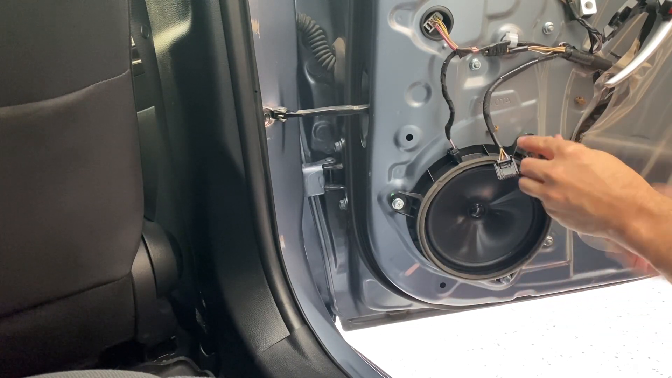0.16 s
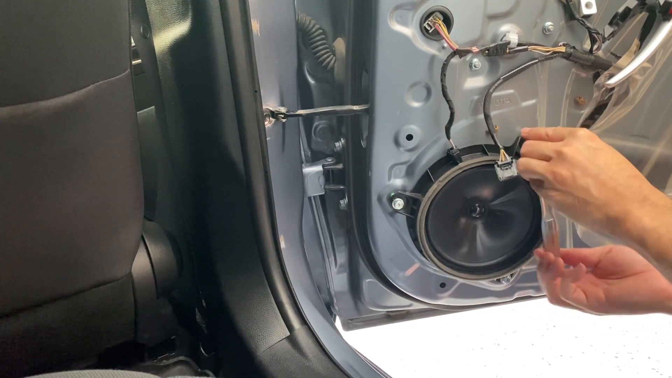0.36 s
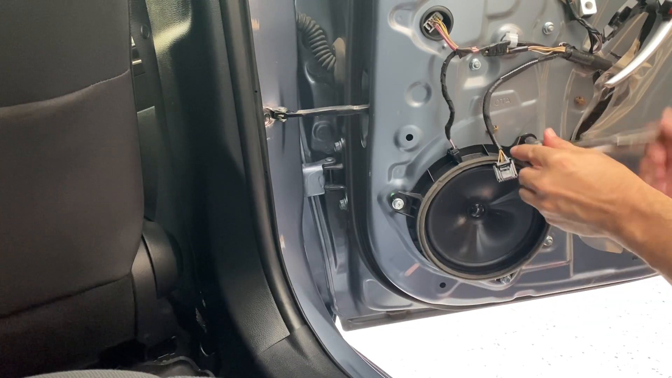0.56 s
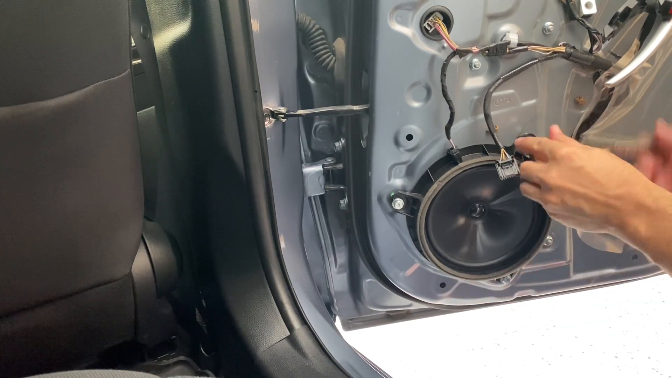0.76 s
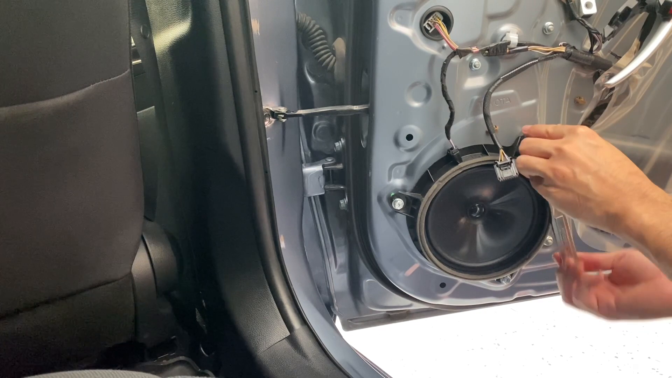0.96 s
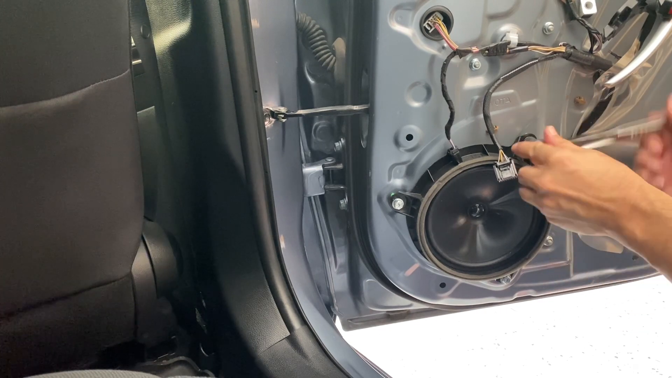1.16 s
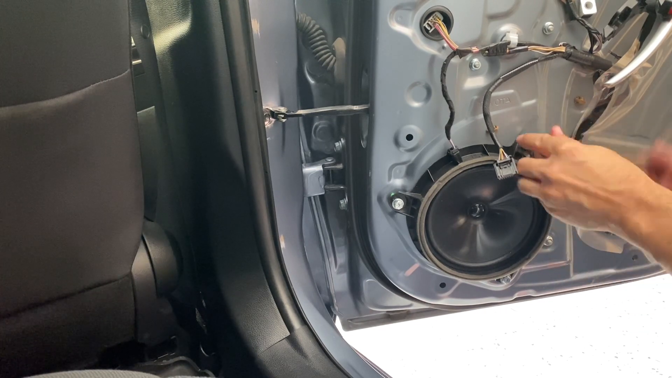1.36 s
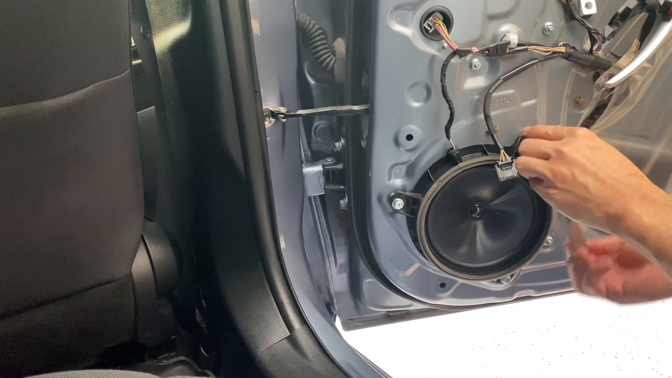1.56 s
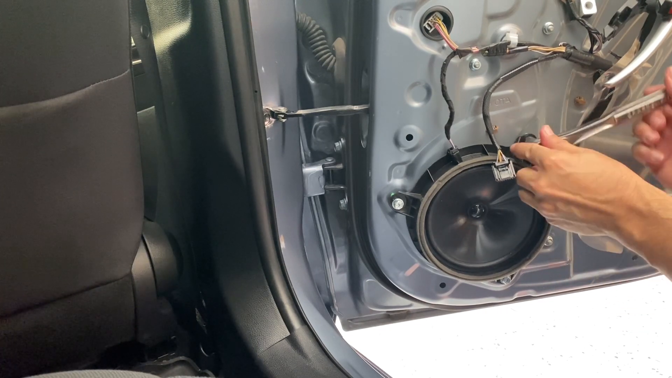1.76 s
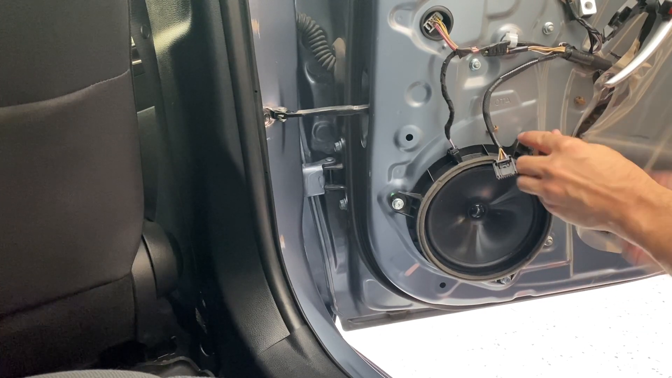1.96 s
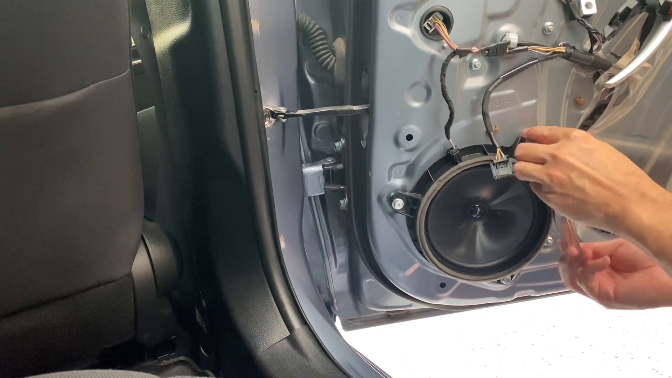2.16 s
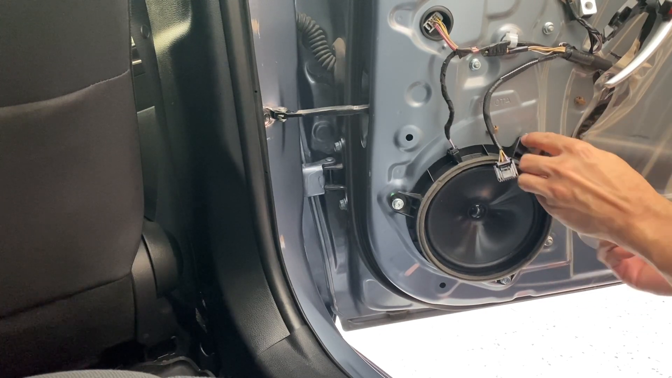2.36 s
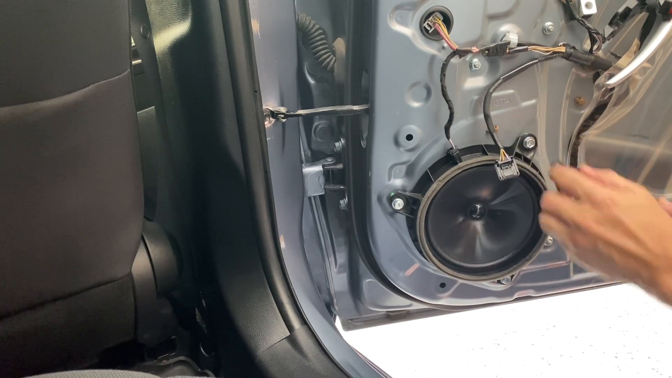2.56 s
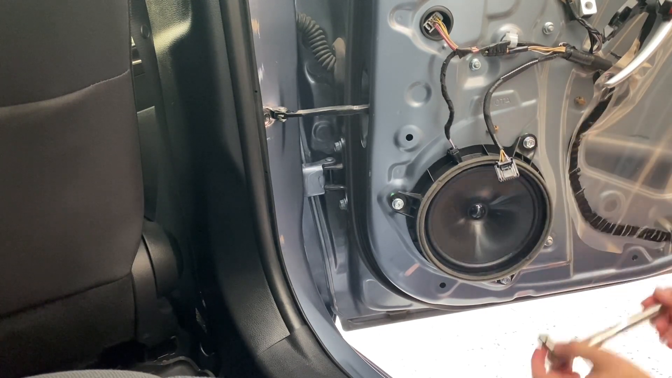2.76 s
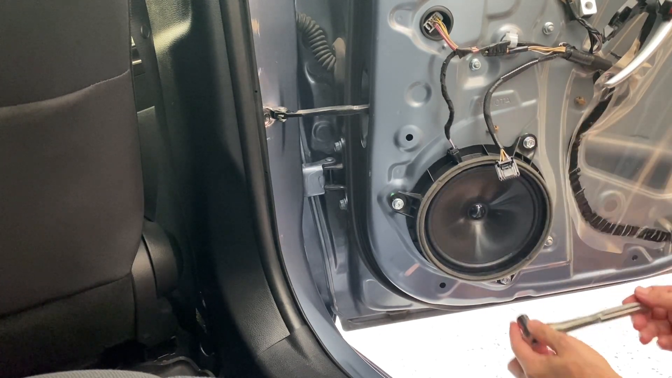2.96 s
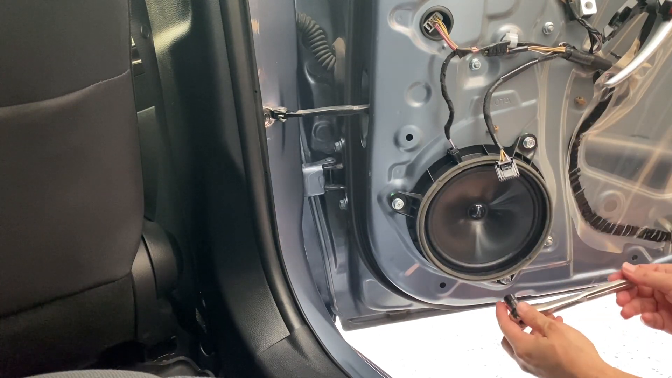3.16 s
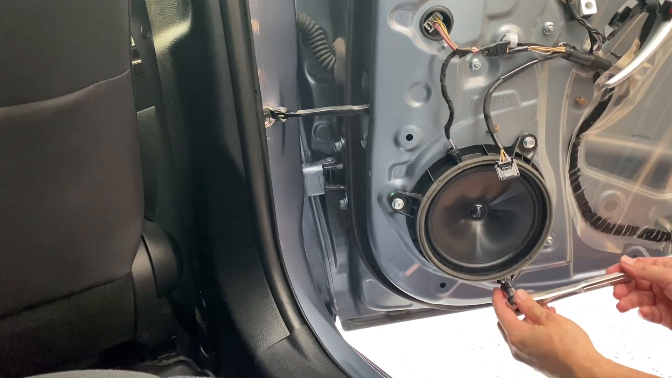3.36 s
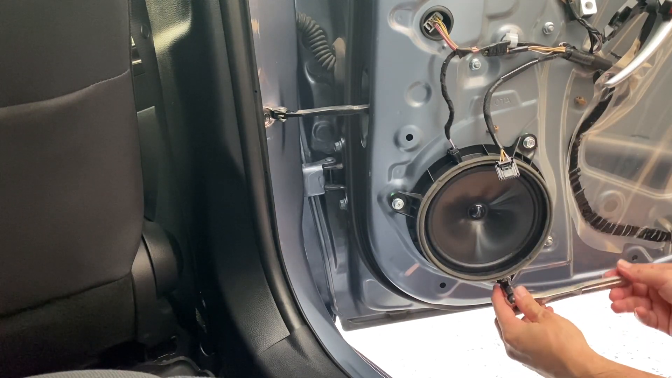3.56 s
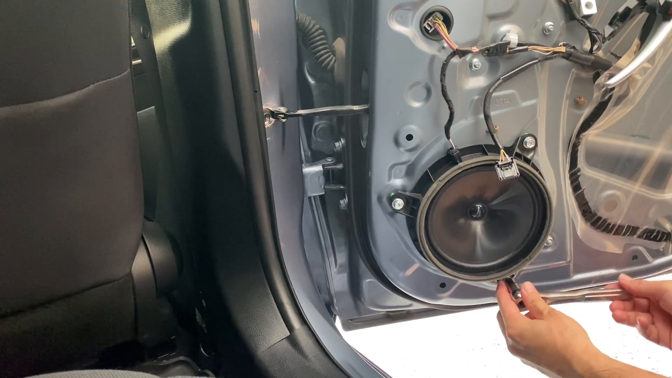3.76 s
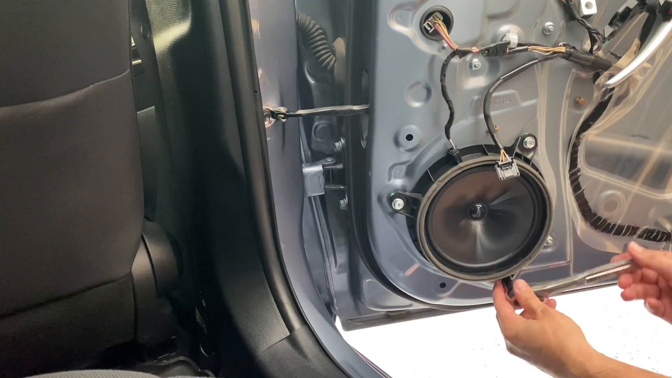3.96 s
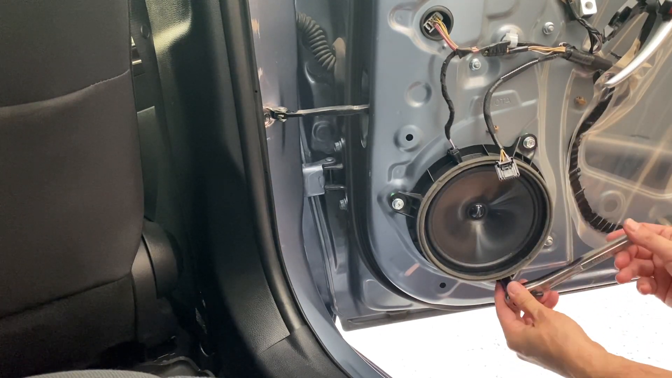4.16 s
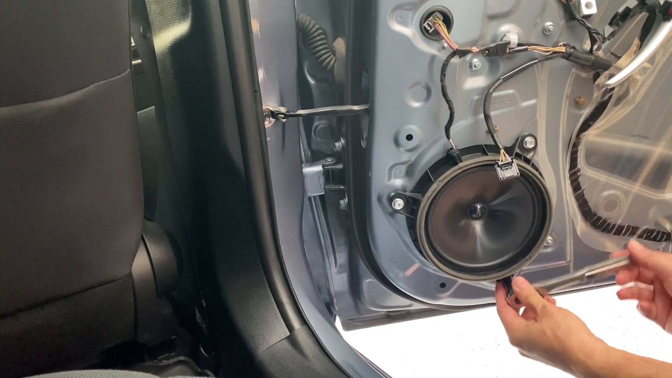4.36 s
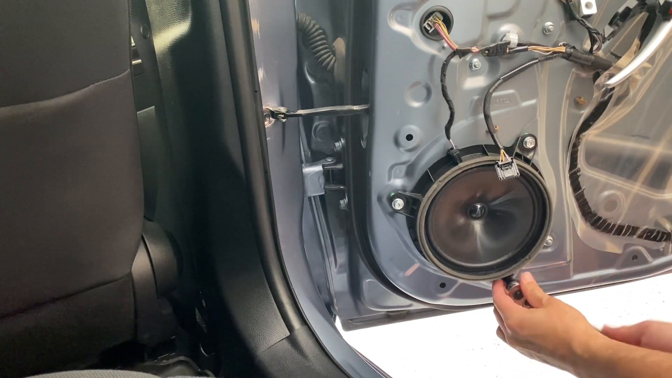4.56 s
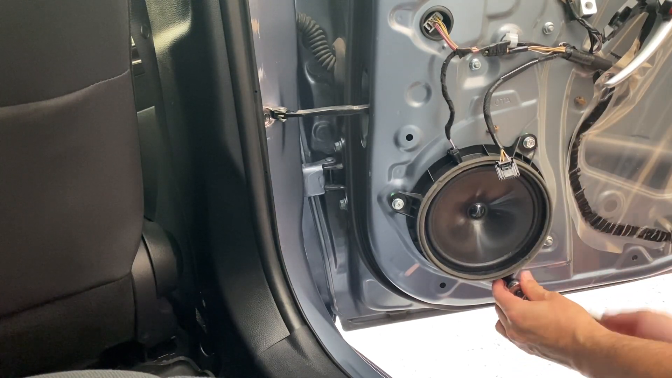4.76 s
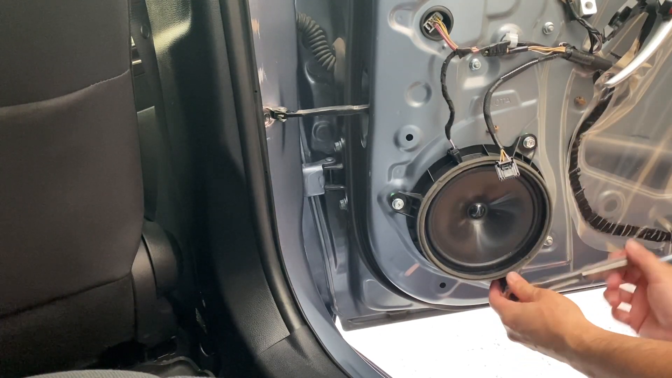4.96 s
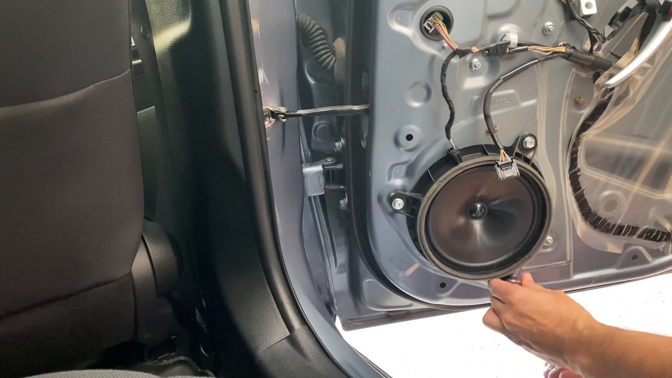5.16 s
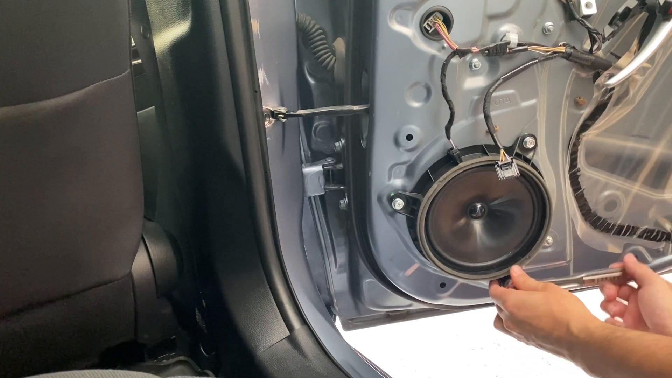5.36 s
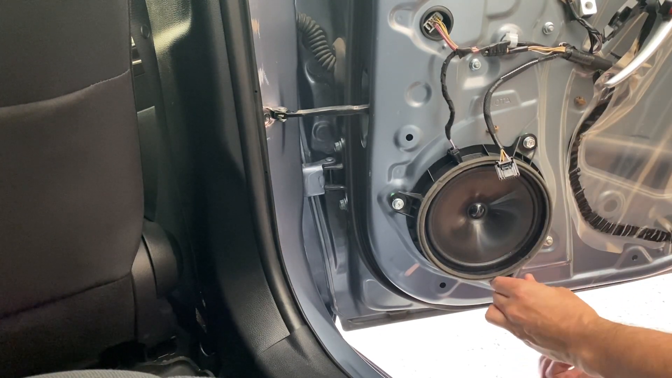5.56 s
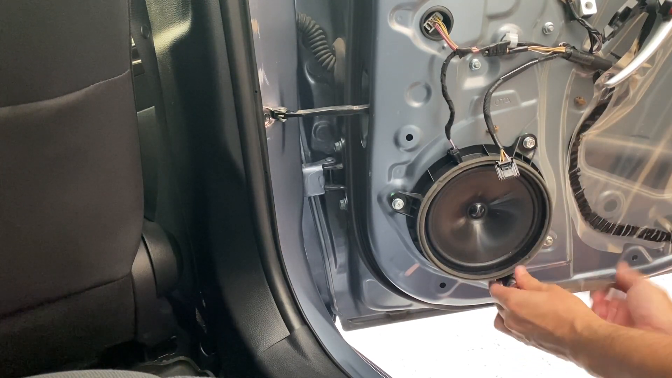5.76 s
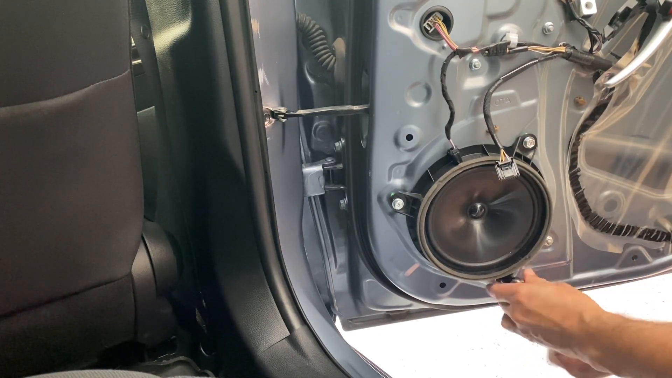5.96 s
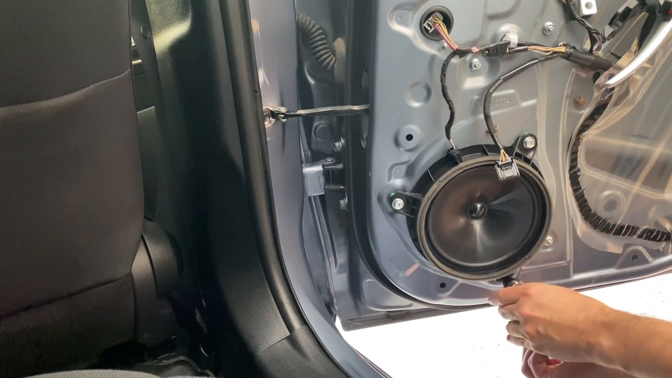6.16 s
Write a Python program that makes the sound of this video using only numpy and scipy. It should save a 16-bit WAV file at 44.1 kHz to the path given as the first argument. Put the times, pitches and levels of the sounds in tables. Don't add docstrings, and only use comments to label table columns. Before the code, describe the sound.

A hand ratchet clicks in quick bursts on a hollow car door, booming softly underneath, then the socket clacks onto a lower bolt and clicks again.

```python
import sys
import numpy as np
from scipy import signal
from scipy.fft import rfft, irfft, next_fast_len
from scipy.io import wavfile

SR = 44100
rng = np.random.default_rng(int(sys.argv[2]) if len(sys.argv) > 2 else 0)


def unload_audio(sound):
    columns = np.transpose(np.atleast_2d(sound))
    steps = np.round(np.clip(columns, -1, 1) * 32767)
    wavfile.write(sys.argv[1], SR, steps.astype(np.int16))


def attenuation_scalar(level_db):
    decades = np.asarray(level_db, float) / 20
    return 10 ** decades


N = 273861

# pitch_hz, level_db (per Hz)
HUSH = [(25, -27), (43, -3), (72, -3), (390, -33.5), (427, -18), (480, -44.5), (9000, -54), (16000, -75.5)]
# pitch_hz, level_db (per Hz)
RUMBLE = [(15, -57.5), (25, -22.5), (92, 0), (178, -2), (227, -11), (303, -19), (400, -33.5), (880, -100)]
# pitch_hz, level_db (per Hz)
SCUFF = [(250, -15.5), (320, 11), (900, -5), (1600, 2.5), (3000, -17.5), (5600, -22.5), (11000, -29.5),
         (16000, -32)]
# start_s, grip_db, slide_db
HAND_WORK = [(0.0, -44, -46.5), (0.25, -42.5, -99), (0.427, -73, -55), (0.574, -41.5, -42),
             (0.803, -45, -61), (1.53, -44, -60), (1.729, -42.5, -46), (2.0, -47, -64.5), (2.6, -61, -81.5),
             (2.859, -77.5, -83.5), (3.452, -71, -84), (3.607, -54.5, -56.5), (4.06, -61.5, -83.5),
             (4.301, -58.5, -73.5), (4.786, -50.5, -74.5), (4.881, -45.5, -62.5), (5.9, -45.5, -61),
             (6.21, -59, -77.5)]
# start_s, peak_db, pitch_hz, swell_ms
BOOMS_UPPER = [(0.024, -20, 184.7, 6.9), (0.105, -28, 186.4, 4.3), (0.119, -21.5, 183.7, 6.3),
               (0.2, -41.5, 181, 13), (0.387, -29.5, 175.3, 5.5), (0.473, -18.5, 172, 6.2),
               (0.494, -20, 166.7, 7.6), (0.532, -27, 177, 16), (0.615, -30, 188.6, 9.3),
               (0.741, -20, 186.6, 10.3), (0.837, -35.5, 189.1, 14), (0.909, -28, 174.2, 9.4),
               (0.996, -26.5, 160.4, 4.4), (1.043, -32, 164.5, 15), (1.08, -25.5, 182.7, 9.6),
               (1.12, -30, 165.2, 13), (1.19, -30, 172, 9), (1.22, -30, 183.8, 6.3),
               (1.34, -20.5, 185.4, 10), (1.437, -31.5, 202.4, 17), (1.495, -30, 144.6, 7.2),
               (1.568, -8.5, 179, 5.7), (1.616, -32, 132, 35), (1.715, -22, 155, 4.2),
               (1.802, -38.5, 200.7, 6.5), (1.902, -20.5, 181, 11), (1.922, -28.5, 182.6, 11),
               (2.063, -35.5, 191.6, 16), (2.257, -31.5, 151.6, 6.8), ]
# start_s, peak_db, pitch_hz, swell_ms
BOOMS_LOWER = [(2.348, -25, 177, 11.5), (2.39, -22, 175, 1.7), (2.452, -35, 123, 5.8), (3.44, -49, 170, 18),
               (3.516, -37, 147, 5.1), (3.648, -36, 135, 10.6), (3.877, -40, 135.3, 7.1),
               (3.932, -31, 141, 17), (3.975, -23, 135, 3.9), (4.456, -41, 172, 4.5),
               (4.504, -20, 150.4, 7.2), (4.756, -17.5, 135, 6.9), (4.798, -25.5, 156.5, 14.4),
               (4.838, -27.5, 183, 12.6), (4.885, -25, 145, 5.9), (4.985, -27, 123, 6.3),
               (5.022, -24.5, 156.5, 12), (5.051, -32, 182, 10), (5.17, -40, 143, 21.6),
               (5.329, -44, 158, 2.9), (5.438, -51, 120.5, 7.6), (5.504, -22.5, 109.3, 5),
               (5.696, -27.5, 150.6, 10.7), (5.817, -29.5, 172, 9.5), (5.836, -33, 135, 8.2),
               (5.908, -28, 126, 11.4), (5.935, -25, 176.4, 13), (6.035, -29.5, 134, 5.7)]
# start_s, peak_db, pitch_hz, swell_ms
SWAYS = [
    (1.573, -46.5, 69.3, 12.5),
    (1.913, -37.5, 65, 16),
    (2.393, -40.5, 69.4, 19),
    (2.489, -43.5, 58.5, 17),
    (2.711, -50.5, 69.3, 29),
    (4.079, -44, 43, 8.1),
    (5.045, -34.5, 63, 13.2),
]
# pitch_hz, level_db, fade_by_60db_s
DOOR_UPPER = [(188.4, 5, 0.081), (274.2, -9.5, 0.16), (300, -12.5, 0.21), (504, -4, 0.016),
              (762, -17, 0.063), (947, -11, 0.027), (1215, -18, 0.042), (1459, -14.5, 0.038),
              (2188, -22, 0.013), (3110, -12, 0.0094)]
# pitch_hz, level_db, fade_by_60db_s
DOOR_LOWER = [(135, 0.5, 0.22), (204.8, 2, 0.051), (453, -3.5, 0.03), (476, 1.5, 0.0091),
              (762, -1.5, 0.011), (877, -5, 0.017), (1277, -20, 0.065), (1625, -28.5, 0.072),
              (2490, -37, 0.056)]
# start_s, peak_db, pitch_hz, fade_ms
NOTES_CAVITY = [
    (0.115, -32.5, 285, 26),
    (0.494, -32, 241, 48),
    (0.539, -38.5, 277, 47),
    (0.611, -37.5, 247, 43),
    (1.564, -26, 300, 13),
    (1.906, -41.5, 262, 31),
    (2.258, -40, 268, 20),
    (2.388, -36, 259, 30),
]
# start_s, peak_db, pitch_hz, fade_ms
NOTES_LOW = [(0.744, -21.5, 476, 4.4), (1.331, -47, 516, 14), (1.561, -19, 486, 9.5), (1.885, -38, 426, 10),
             (2.375, -28.5, 434, 16.4), (3.433, -33, 442, 10), (3.507, -42.5, 520, 24),
             (3.92, -32.5, 418, 14), (3.949, -30, 431, 18), (4.467, -33, 488.5, 16), (5.01, -35.5, 548, 11),
             (5.469, -61, 406, 11)]
# start_s, peak_db, pitch_hz, fade_ms
NOTES_MIDDLE = [(0.544, -37, 947, 16), (0.569, -34.5, 922, 7.8), (0.744, -44, 696, 10),
                (1.33, -32, 933, 10), (1.559, -34.5, 953, 7.2), (1.691, -43, 920, 11),
                (2.382, -28, 750, 14), (3.434, -38.5, 778, 24), (3.56, -46, 890, 14),
                (3.607, -39.5, 890, 15), (3.636, -33, 864, 13.2), (3.8, -53, 787, 14),
                (3.924, -31.5, 762, 26), (3.949, -36.5, 874, 13), (4.459, -37, 871, 19),
                (4.483, -34, 870, 9.6), (4.736, -37, 857, 17), (4.805, -38.5, 829, 8),
                (4.821, -40, 884, 41), (4.864, -38, 877, 21), (5.014, -54, 747, 17),
                (5.248, -43.5, 896, 14), (5.917, -43, 846, 15)]
# start_s, peak_db, pitch_hz, fade_ms
NOTES_UPPER = [(0.513, -35.5, 1182, 22), (0.612, -51, 1093, 10), (1.033, -42, 1245, 8.3),
               (1.073, -35, 1252, 8.4), (1.108, -48, 1151, 15), (1.1867, -55, 1450, 10),
               (1.3258, -27, 1192, 7.5), (1.6028, -43, 1438, 11), (1.641, -38, 1185, 12),
               (1.704, -34, 1234, 12.3), (3.4282, -43.5, 1266, 5.3), (4.802, -41.5, 1193, 14),
               (5.0125, -46.5, 1320, 13), (5.162, -47.5, 1377, 7), (5.7266, -38.5, 1304, 14),
               (5.884, -49, 1246, 12), (5.9199, -45, 1396, 9.8), (6.0077, -52.5, 1610, 12)]
# start_s, peak_db, pitch_hz, fade_ms
NOTES_HANDLE = [(0.5102, -36.5, 2070, 8.6), (0.5282, -28, 2850, 5.3), (0.5614, -35.5, 2910, 4.9),
                (1.0595, -43, 3130, 4.8), (1.0755, -30.5, 2870, 4.1), (1.0929, -27, 3000, 3.7),
                (1.1099, -25.5, 2980, 6.4), (1.1264, -27.5, 2860, 4.8), (1.1433, -32, 3170, 6.5),
                (1.1644, -34, 2490, 6), (1.1872, -36, 2350, 4.9), (1.6601, -31, 3060, 6.3),
                (1.6861, -35, 2920, 6.3), (2.0692, -51.5, 2900, 5.5), (4.4842, -41.5, 2075, 6),
                (4.7416, -32, 2100, 2.9), (4.8065, -41.5, 2283, 6), (4.8239, -31.5, 2275, 5),
                (4.8658, -41.5, 2480, 5), (5.3158, -43, 2294, 15), (5.3393, -47.5, 2960, 15),
                (5.68, -47.5, 3170, 6), (5.7463, -37, 2660, 5), (5.7703, -38.5, 3150, 7.7),
                (5.8815, -46.5, 2530, 7.1), ]
# start_s, peak_db, dull_db, fade_ms
CLACKS = [(0.0464, -47, -39, 21), (0.069, -48, -50, 3.9), (0.082, -46.5, -53, 4.5),
          (0.095, -29, -27.5, 7.7), (0.738, -34, -28.5, 8.7), (0.817, -50.5, -67.5, 22.5),
          (0.869, -49, -40, 6.7), (1.3277, -30.5, -29, 8.6), (1.49, -44.5, -33.5, 4.3),
          (1.557, -28, -18.5, 6.2), (1.5814, -42, -33, 19), (2.15, -46.5, -40.5, 9.6),
          (2.1836, -53, -40.5, 13), (2.3858, -33, -36.5, 17), (2.9032, -59.5, -83.5, 6.3),
          (3.12, -68.5, -85, 5), (3.4316, -24.5, -32, 13), (3.6318, -23.5, -31, 10.3),
          (4.4846, -38.5, -39, 11), (4.7401, -32.5, -34, 14), (5.4864, -30.5, -28, 14),
          (5.68, -42, -50, 18), (5.915, -33.5, -34.5, 18), (5.9427, -32, -39, 4.8)]
# start_s, peak_db, dull_db
TAPS = [(0.0122, -41.5, -32.5), (0.1097, -33.5, -30), (0.4236, -37, -36.5), (0.9839, -55.5, -31.5),
        (1.0312, -43, -33.5), (1.4403, -67.5, -37), (1.6266, -35, -41.5), (1.886, -31, -26.5),
        (2.0485, -55, -45), (2.0669, -45.5, -46.5), (2.2433, -48, -40.5), (2.2485, -57, -47),
        (2.2635, -50.5, -47), (2.316, -53.5, -45), (2.3365, -73, -40), (2.3714, -60, -24.5),
        (3.927, -42, -30), (3.9447, -24, -50), (3.9594, -37.5, -35.5), (4.449, -53.5, -43.5),
        (5.005, -42, -29), (5.1598, -49.5, -43.5), (5.2469, -34, -34.5), (5.272, -37.5, -42),
        (5.467, -31.5, -35.5)]
# start_s, peak_db, dull_db
DRAGS = [(0.189, -45.5, -43), (0.412, -55, -50.5), (0.3798, -50.5, -41.5), (0.4506, -44, -34),
         (1.8554, -51, -39), (3.507, -48.5, -53), (3.6116, -41, -40.5), (3.686, -50.5, -46),
         (3.54, -50, -51), (3.806, -51, -51.5), (3.828, -68, -54.5), (3.9074, -61.5, -42.5),
         (4.2434, -53, -53), (4.4605, -40, -34), (4.604, -87, -53.5), (4.73, -44.5, -39.5),
         (4.762, -43.5, -38.5), (5.4433, -41.5, -42), (5.6684, -35.5, -38), (5.8252, -45, -46),
         (5.88, -37, -39.5), (6.0154, -61, -43.5)]
# start_s, peak_db, dull_db, fade_ms
RUBS = [
    (3.455, -56.5, -52.5, 82),
    (3.654, -54, -52, 25),
    (3.977, -66.5, -45.5, 29),
    (4.273, -83, -61, 51),
    (4.59, -77.5, -67, 15),
    (5.30, -42.5, -41.5, 59),
    (5.385, -59, -67, 40),
    (5.515, -65, -52, 99),
    (5.75, -38, -43.5, 78),
    (5.965, -63, -73.5, 29),
]
# start_s, peak_db
RUSTLES = [
    (5.99, -60),
    (6.045, -52.5),
    (6.085, -61.5),
    (6.13, -69),
]
# start_s, crack_db, door_db, head_ring_db
TEETH_UPPER = [(0.4671, -22, -43, -19.5), (0.488, -23, -43.5, -24.5), (0.5072, -17, -44, -27.5),
               (0.5237, -32, -38, -20), (0.5412, -27, -45, -19), (0.5600, -20.5, -44.5, -16.5),
               (0.5800, -19.5, -49, -22), (0.6066, -17.5, -45, -24.5), (0.6485, -23.5, -43, -29.5),
               (1.0571, -42.5, -46.5, -49.5), (1.0736, -30.5, -36.5, -34), (1.0925, -18, -38.5, -40.5),
               (1.1079, -22, -38, -22.5), (1.1248, -17.5, -44, -36.5), (1.1416, -26.5, -38.5, -20),
               (1.161, -23.5, -44.5, -38), (1.184, -30.5, -42, -22), (1.215, -20.5, -43.5, -28.5),
               (1.6403, -27, -35.5, -46), (1.6561, -24, -37.5, -29), (1.6704, -32.5, -42, -28),
               (1.6851, -16.5, -39.5, -39.5), (1.699, -39, -37.5, -22.5), (1.72, -19, -43.5, -41),
               (1.748, -22, -46, -32.5), (1.8022, -24, -41.5, -21)]
# start_s, crack_db, door_db, head_ring_db
TEETH_LOWER = [(2.386, -24, -43.5, -37), (2.779, -39, -71.5, -64), (4.784, -48, -56, -42),
               (4.8034, -27, -38.5, -31), (4.8223, -13, -37, -33), (4.8409, -24, -39, -27.5),
               (4.864, -17.5, -42, -33), (4.8979, -20.5, -41.5, -57.5), (5.2699, -53, -45.5, -67.5),
               (5.2958, -20, -39.5, -48.5), (5.3145, -26.5, -36.5, -25), (5.3388, -17.5, -37, -30.5),
               (5.358, -31.5, -44.5, -32), (5.725, -20.5, -41, -42), (5.747, -14, -42.5, -36),
               (5.7681, -23.5, -39.5, -31), (5.7887, -21, -40.5, -51.5), (5.805, -19, -50, -41)]
# pitch_hz, level_db, fade_by_60db_s
HEAD_6K = [(6350, 3, 0.045), (6400, 1, .035), (6640, -3, 0.02), (5510, -13, 0.028)]
# pitch_hz, level_db, fade_by_60db_s
HEAD_8K = [(8130, 0, .025), (8500, -5, .02)]
# pitch_hz, level_db, fade_by_60db_s
HEAD_11K = [(10700, -6, .012), (11060, -4, .025), (11200, -1, .03), (11430, -4, .022), (11800, -5, .012),
            (14280, -9, .03), (14800, -10, .015), (15300, -8, .015)]
# pitch_hz, level_db, fade_by_60db_s
HANDLE = [(2394, -20, 0.026), (2949, -16, 0.0091), (3500, -21, 0.006), (4080, -17, 0.025),
          (4440, -20, 0.016), (5770, -22.5, 0.016)]
# pitch_hz, right_leads_radians, left_minus_right_db, unrelated_share (0-1)
PORTS = [(80, .1, -1.4, .15), (190, .3, -.5, .12), (330, .8, -4, .35), (800, .7, -5.5, .55),
         (1700, .8, 1, .6), (2500, -.4, 2, .6), (5000, -.6, 2, .85), (6600, -.2, 0, .5)]

MOVE_S = 2.33
SEATING_S, SEATING_HALF_S = 3.9, .75
HUSH_DB = -57.5
GARAGE_T60_S, WALL_CUT_HZ, GARAGE_DB = 0.4, 4100, -23.5
TAP_FADE_MS, DRAG_FADE_MS = 9.8, 14.9
CLACK_BRIGHT_DB, TAP_BRIGHT_DB, DRAG_BRIGHT_DB, RUB_BRIGHT_DB = -4.5, -18.5, -20, -19.5
SLIDE_BRIGHT_DB = -5
NOTE_DB, NOTE_RISE_MS, NOTE_WAVER_DB = -2.5, 1.6, 5.5
NOTE_TWIN, NOTE_TWIN_DB = 1.055, -7
TURN_FROM_HZ, TURN_TO_HZ = 6950, 15400
OVERLOAD = .34


def rms_one(x):
    return x / np.sqrt(np.mean(x ** 2) + 1e-20)


def band(x, lo_hz, hi_hz):
    return signal.sosfilt(signal.butter(2, [lo_hz, hi_hz], "band", fs=SR, output="sos"), x)


def coloured(spectrum):
    hz, level_db = np.transpose(spectrum)
    grid = np.maximum(np.arange(N // 2 + 1) * SR / N, 1)
    shape = attenuation_scalar(np.interp(np.log(grid), np.log(hz), level_db, left=-80))
    return rms_one(irfft(rfft(rng.standard_normal((2, N))) * shape, N))


def flicker(per_s):
    knots = rng.standard_normal(int(N / SR * 200) + 2)
    return np.interp(np.arange(N) / SR * per_s, np.arange(len(knots)), knots)


def ring(push, modes):
    out = 0
    for k, (hz, level_db, t60) in enumerate(modes):
        decay = attenuation_scalar(-60 / (t60 * SR))
        w = 2 * np.pi * hz / SR
        feedback = [1, -2 * decay * np.cos(w), decay * decay]
        tone = signal.lfilter([0, np.sin(w)], feedback, push + 1e-18)
        out = out + (-1) ** k * attenuation_scalar(level_db) * tone
    return out


def bursts(times, level_db, fade_ms, rise_ms):
    envelope = np.zeros(N + 8192)
    t_ms = np.arange(8192) * 1000 / SR
    for s, gain, fade, rise in np.broadcast(times, attenuation_scalar(level_db), fade_ms, rise_ms):
        shape = (1 - np.exp(-t_ms / rise)) * np.exp(-t_ms / fade)
        envelope[round(s * SR):][:8192] += gain * shape
    return envelope[:N] * rng.uniform(-np.sqrt(3), np.sqrt(3), (2, N))


def hush():
    return attenuation_scalar(HUSH_DB - 5.0 + 1.9 * flicker(1.3)) * coloured(HUSH)


def garage(x):
    size = next_fast_len(N + SR)
    w = 2 * np.pi * np.arange(size // 2 + 1) / size
    dull = 1 / (1 + .3j * w * SR / (2 * np.pi * WALL_CUT_HZ))
    lags = (rng.uniform(0.0068, 0.05, (6, 2, 1)) * SR).astype(int)
    loops = attenuation_scalar(-60 * lags / SR / GARAGE_T60_S) * dull * np.exp(-1j * w * lags)
    signs = (-1) ** np.arange(6)[:, None, None]
    echoes = np.sum(signs * loops / (1 - loops), axis=0)
    return irfft(rfft(x, size) * echoes, size)[:, :N]


def hand():
    s, *levels = np.transpose(HAND_WORK)
    rumble_db, slide_db = [np.interp(np.arange(N) / SR, s, level) for level in levels]
    scuff, grain = coloured(SCUFF), flicker(70)
    rumble = attenuation_scalar(rumble_db + 3.5 * flicker(25)) * coloured(RUMBLE)
    dull = attenuation_scalar(slide_db + 2.7 * grain) * rms_one(band(scuff, 460, 1500))
    bright = attenuation_scalar(slide_db + SLIDE_BRIGHT_DB + 2.7 * grain) * rms_one(band(scuff, 1400, 16000))
    return rumble + dull + bright


def door(push):
    upper = np.arange(N) < MOVE_S * SR
    return ring(push * upper, DOOR_UPPER) + ring(push * ~upper, DOOR_LOWER)


def booms():
    out = np.zeros(N + 8192)
    t = np.arange(8192) / SR
    pushes = BOOMS_UPPER + BOOMS_LOWER + SWAYS
    for (s, peak_db, hz, swell_ms), turn in zip(pushes, rng.random(len(pushes))):
        u = t * 1000 / swell_ms
        swell = (u * np.exp(1 - u)) ** 2.0
        sagging_t = t + 0.0012 * (1 - np.exp(-t / 0.0032))
        start = max(round((s - .001) * SR), 0)
        out[start:][:8192] += attenuation_scalar(peak_db) * swell * np.sin(2 * np.pi * (hz * sagging_t + turn))
    out = out[:N] + attenuation_scalar(-58.5) * door(out[:N])
    return np.array([out, np.roll(out, 90)])


def notes():
    out = np.zeros((2, N + 4096))
    t_ms = np.arange(4096) * 1000 / SR
    rows = NOTES_CAVITY + NOTES_LOW + NOTES_MIDDLE + NOTES_UPPER + NOTES_HANDLE
    for (s, peak_db, hz, fade_ms), turn in zip(rows, rng.random((len(rows), 2, 1))):
        shape = (1 - np.exp(-t_ms / NOTE_RISE_MS)) * np.exp(-t_ms / fade_ms)
        start, cycles = round(s * SR), hz * t_ms / 1000
        tone = np.sin(2 * np.pi * (cycles + turn))
        twin = np.sin(2 * np.pi * (NOTE_TWIN * cycles + turn[::-1]))
        pair = tone + attenuation_scalar(NOTE_TWIN_DB) * twin
        out[:, start:start + len(t_ms)] += attenuation_scalar(peak_db + NOTE_DB) * shape * pair
    return attenuation_scalar(NOTE_WAVER_DB * flicker(120)) * out[:, :N]


def rustles(rattle):
    s, rustle_db = np.transpose(RUSTLES)
    return band(band(rattle * bursts(s, rustle_db, 33, 6.4), 1400, 2900), 1000, 3300)


def socket():
    rows = [(*row, CLACK_BRIGHT_DB) for row in CLACKS]
    rows += [(*row, TAP_FADE_MS, TAP_BRIGHT_DB) for row in TAPS]
    rows += [(*row, DRAG_FADE_MS, DRAG_BRIGHT_DB) for row in DRAGS]
    rows += [(*row, RUB_BRIGHT_DB) for row in RUBS]
    s, peak_db, dull_db, fade_ms, bright_db = np.transpose(rows)
    rattle = attenuation_scalar(3.0 * flicker(180))

    snap = rattle * bursts(s, peak_db + bright_db + 0.5, 0.3 * fade_ms, 0.012 * fade_ms)
    sheen = bursts(s, peak_db + bright_db - 19.0, 1.3 * fade_ms, 2.5)
    bright = band(band(snap, 5200, 15500), 3000, 16000) + band(sheen, 9800, 15900)
    shaded = np.abs(np.arange(N) / SR - SEATING_S) < SEATING_HALF_S
    bright = np.where(shaded, band(bright, 2500, 10500), bright)

    knock = rattle * bursts(s, peak_db - 5.0, fade_ms, 0.15 * fade_ms)
    middle = band(band(knock, 1800, 6500), 460, 12000)
    lower = attenuation_scalar(-1.5) * middle + attenuation_scalar(-2.0) * band(middle, 1960, 2350)
    lower = lower + attenuation_scalar(-8.5) * band(middle, 4300, 5600)
    middle = np.where(np.arange(N) < MOVE_S * SR, middle, lower)

    dull = bursts(s, dull_db, 1.53 * fade_ms, 2.1)
    thud = attenuation_scalar(-4.0) * band(band(dull, 270, 1700), 200, 5800)
    sheet = attenuation_scalar(-19.5) * band(door(dull + .5 * middle), 260, 10000)
    return rustles(rattle) + bright + middle + thud + sheet


def ratchet():
    s, crack_db, door_db, db_11k = np.transpose(TEETH_UPPER + TEETH_LOWER)
    db_8k = door_db - 0.5 + rng.normal(0, 7.2, len(s))
    cupped_db = np.where(s > MOVE_S, -14, 0)

    crack = band(bursts(s, crack_db - 4.0 + 0.18 * cupped_db, 2.8, 0.22), 6400, 15800)
    crack = np.where(np.arange(N) < MOVE_S * SR, crack, band(crack, 3000, 12500))
    after = band(bursts(s, crack_db - 21.0, 6.7, .8), 4400, 15800)

    db_6k = 0.16 * crack_db + 0.48 * db_11k - 38.5 + cupped_db
    rings = ring(bursts(s, db_6k, 1.7, 0.2)[0], HEAD_6K)
    rings += ring(bursts(s, db_8k - 9 + 0.42 * cupped_db, 2.0, 0.067)[0], HEAD_8K)
    rings += ring(bursts(s, db_11k - 12.5, 0.78, 0.6)[0], HEAD_11K)

    grip_db = rng.normal(0, 3.5, (len(s), len(HANDLE)))
    handle = 0
    for k, mode in enumerate(HANDLE):
        handle = handle + ring(bursts(s, door_db - 0.5 + grip_db[:, k], 4.1, 0.81), [mode])

    dull = attenuation_scalar(2.3 * flicker(200)) * bursts(s, door_db + 3.0, 12.0, 0.4)
    sheet = attenuation_scalar(-19.5) * band(door(dull), 270, 3200)
    steel = band(rings, 4000, 13000) + band(handle, 2700, 5800)
    return crack + after + steel + band(dull, 1000, 6200) + sheet


def ports(pair):
    grid = np.arange(N // 2 + 1) * SR / N
    hz, *columns = np.transpose(PORTS)
    lead, lean_db, apart = [np.interp(np.log(grid + 1), np.log(hz), c) for c in columns]
    turned = np.clip((grid - TURN_FROM_HZ) / (TURN_TO_HZ - TURN_FROM_HZ), 0, 1)
    lead = np.where(turned > 0, 4 * np.pi * turned, lead)
    apart = np.where(turned > 0, .03, apart) / np.sqrt(2)
    shared, own = rfft(pair)
    side = np.array([[1], [-1]])
    mixed = np.sqrt(1 - apart ** 2) * shared + side * apart * own
    lean = attenuation_scalar(side * lean_db * (1 - turned) ** 4 / 2)
    return irfft(mixed * lean * np.exp(-.5j * side * lead), N)


def scene():
    hits = ratchet() + socket() + notes()
    near = hits + booms() + hand() + attenuation_scalar(GARAGE_DB) * garage(hits[0])
    return ports(near + hush())


def band_limit(x):
    return signal.sosfilt(signal.butter(12, 17150, fs=SR, output="sos"), x)


def record(dry):
    dry = OVERLOAD * np.tanh(dry / OVERLOAD)
    dry = dry + attenuation_scalar(-7.0) * band(dry, 14300, 15800) + attenuation_scalar(-13.0) * band(dry, 10660, 12000)
    cut = signal.sosfilt(signal.cheby2(8, 17, 16080, fs=SR, output="sos"), dry)
    cut = signal.sosfilt(signal.cheby2(12, 50, 17250, fs=SR, output="sos"), cut)
    cut = signal.sosfilt(signal.butter(4, 38, "high", fs=SR, output="sos"), cut)
    return band_limit(cut)


dry = scene()
out = record(dry)
unload_audio(out)
```